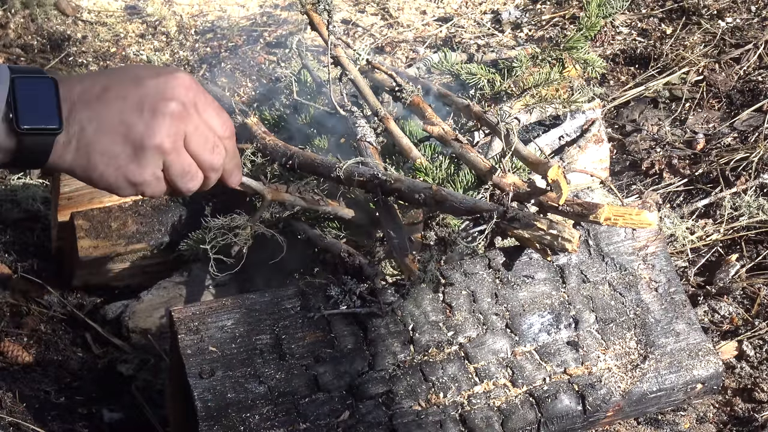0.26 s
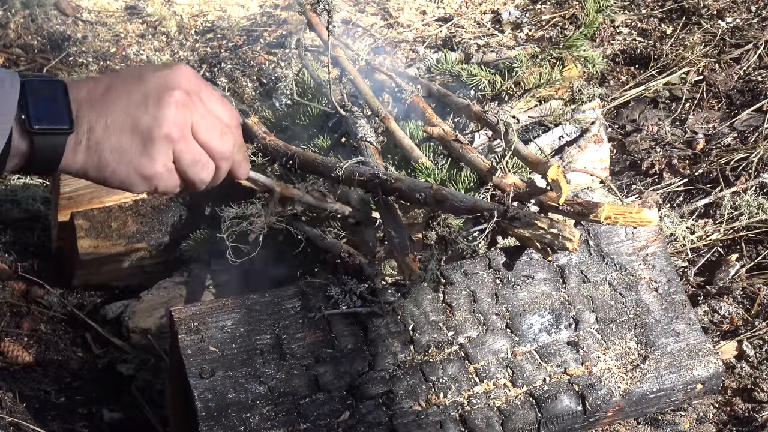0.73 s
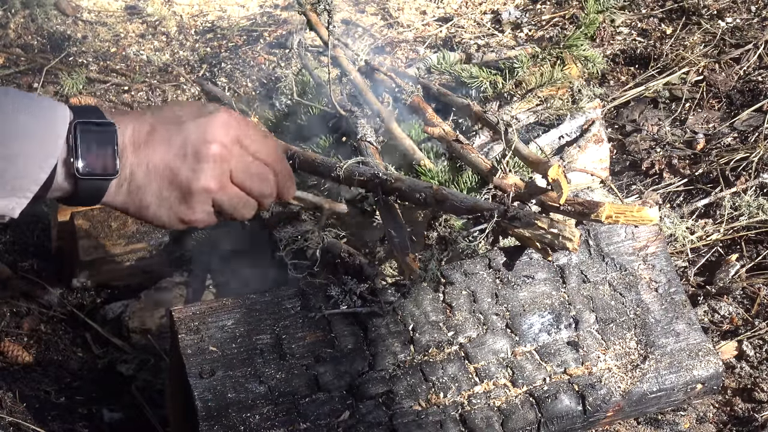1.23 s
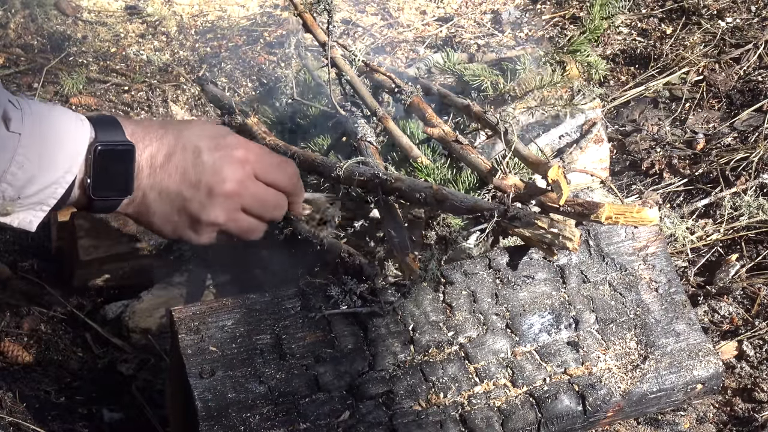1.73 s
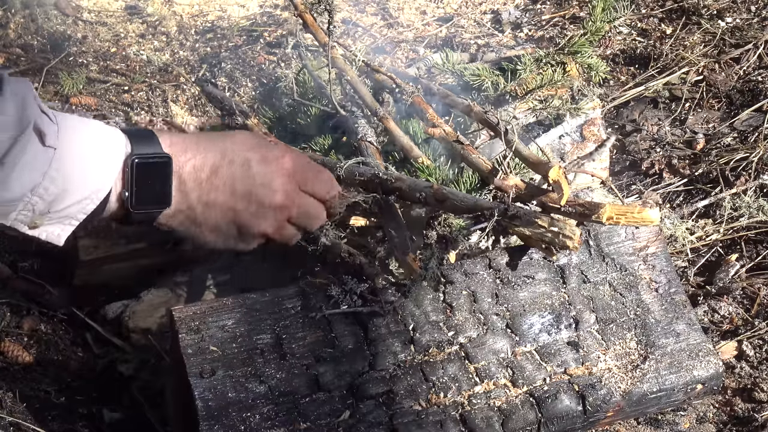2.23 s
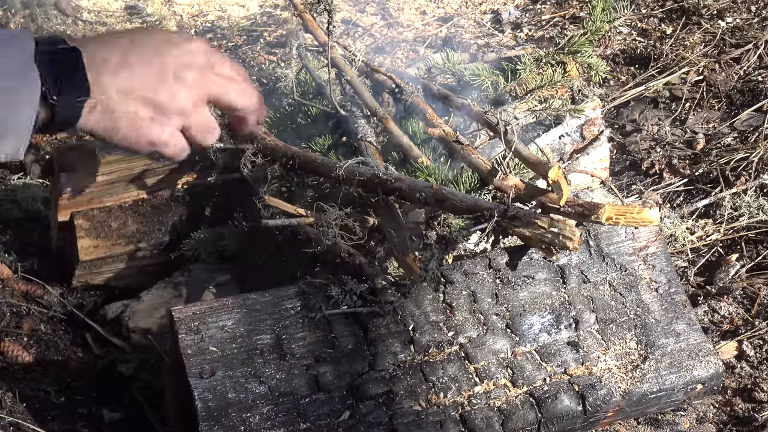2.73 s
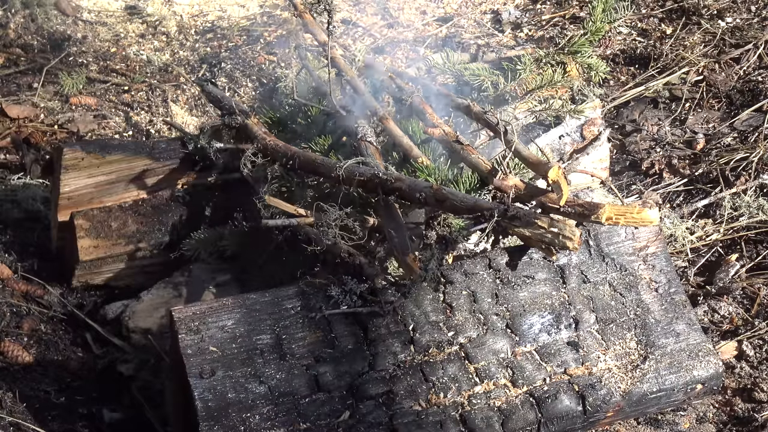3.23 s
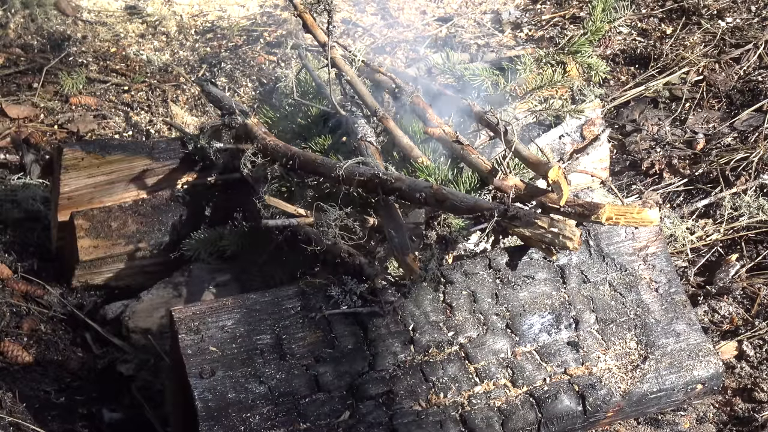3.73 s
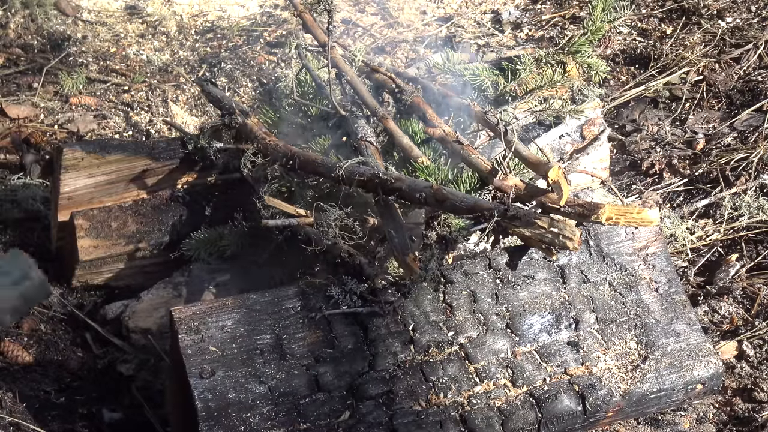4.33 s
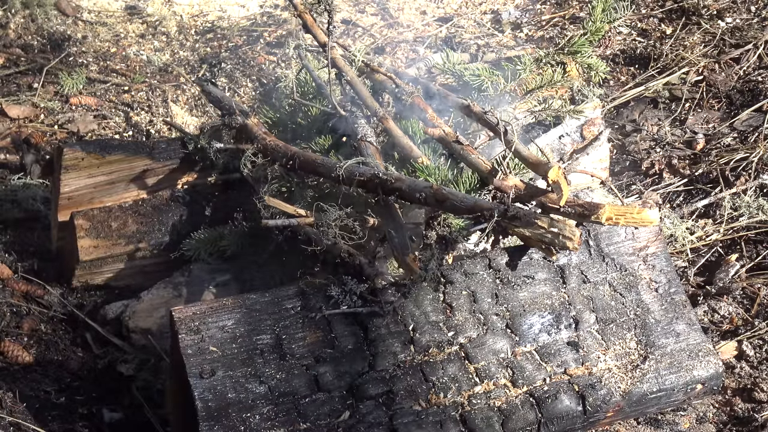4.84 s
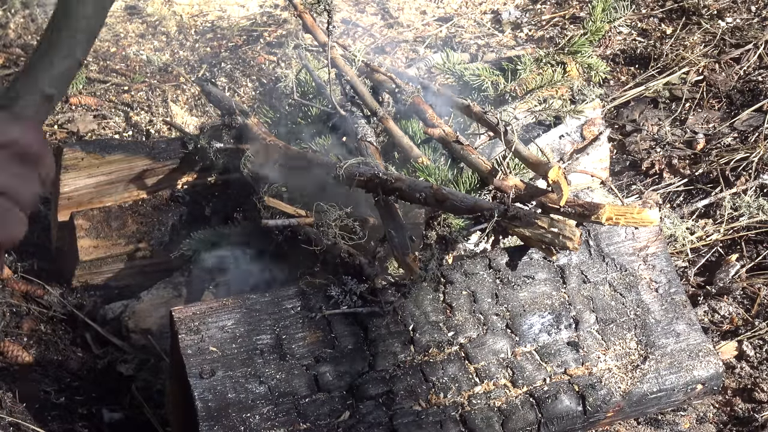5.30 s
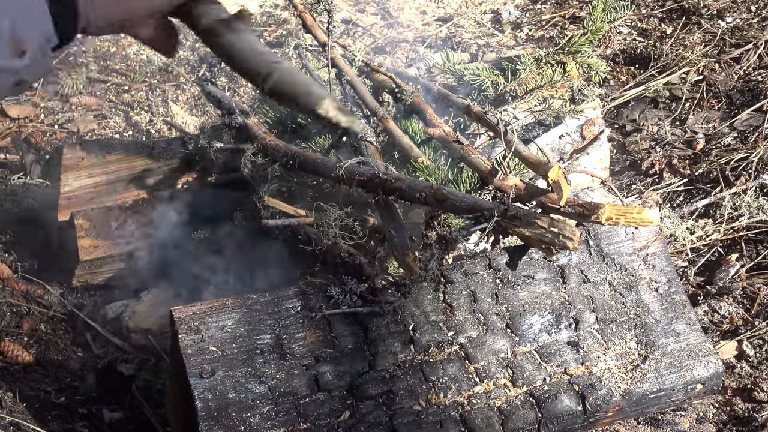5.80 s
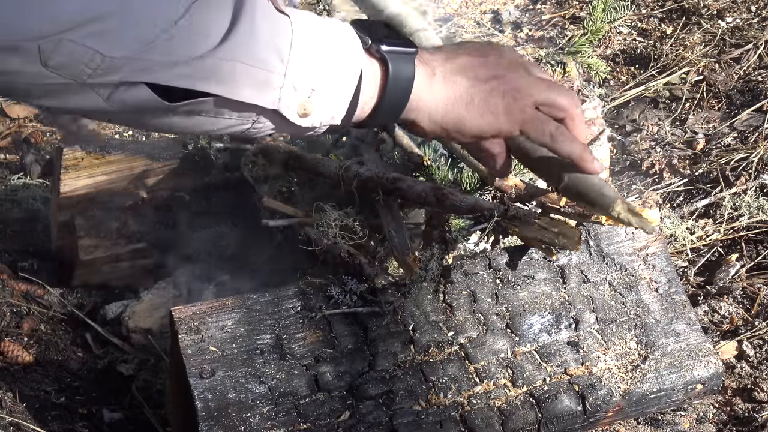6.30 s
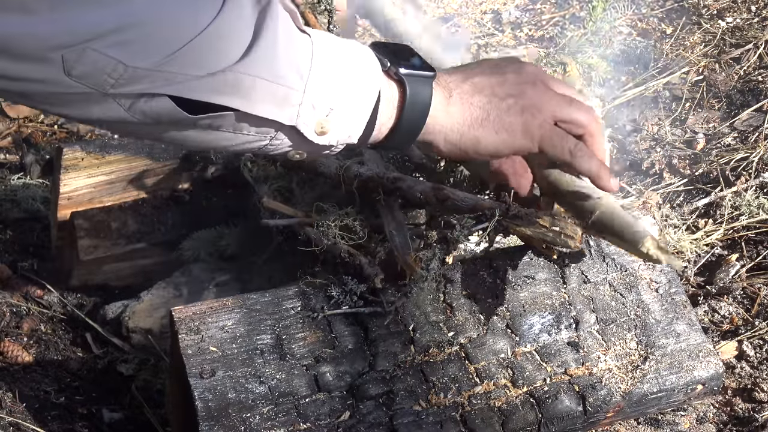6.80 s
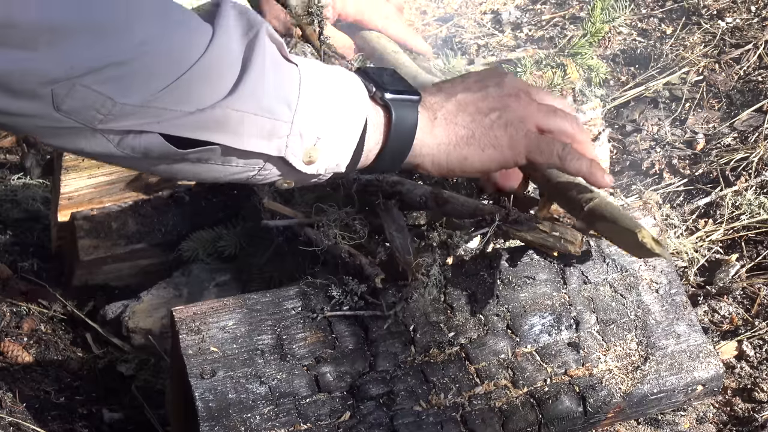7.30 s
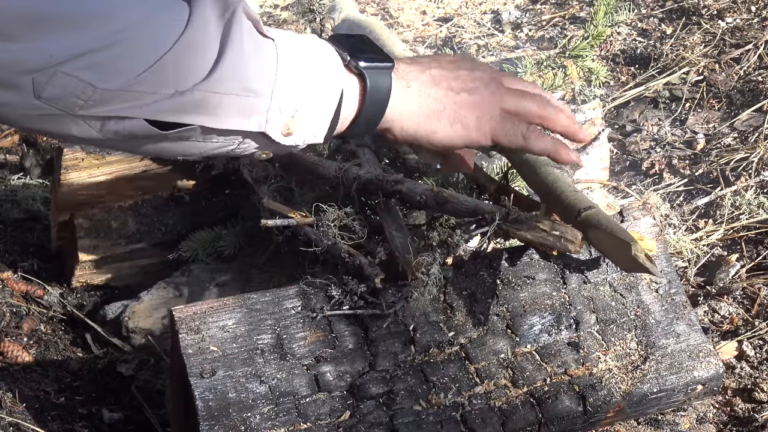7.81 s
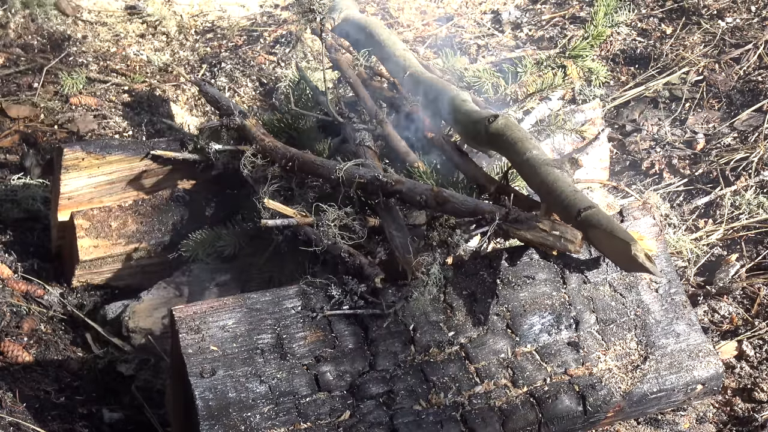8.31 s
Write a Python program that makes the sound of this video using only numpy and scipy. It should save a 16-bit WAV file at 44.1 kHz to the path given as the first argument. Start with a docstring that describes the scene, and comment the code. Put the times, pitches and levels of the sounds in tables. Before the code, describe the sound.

Close, dry twig fire: irregular pops and bright cracks over faint sizzling, sleeve brushing, sticks knocking, and gusts buffeting the microphone towards the end.

```python
"""Sharp cracks of burning twigs come first: a small kindling fire at a forest campsite, heard close by.
Cracks are pulses with a dying spray, split into bands; knocking sticks are struck damped modes.
Rustle, sizzle and a brushing sleeve are coloured noise of fluctuating level; ticks and pips are clicks.
Short narrow-band puffs are noise through a resonance, a far bird chips in falling sines, and gusts
rumble as low noise on a little microphone."""
import sys
import numpy as np
from scipy import signal
from scipy.fft import rfft, irfft, next_fast_len
from scipy.io import wavfile

SR = 44100
rng = np.random.default_rng(int(sys.argv[2]) if len(sys.argv) > 2 else 0)


def wav_record(signal):
    """Record a signal, one row per channel, as 16-bit PCM in the file named by sys.argv[1]."""
    frames = np.transpose(np.atleast_2d(signal))
    bounded = np.clip(frames, -1, 1)
    # unit amplitude maps onto the largest positive 16-bit level
    quanta = np.round(bounded * 32767).astype(np.int16)
    wavfile.write(sys.argv[1], SR, quanta)


N = 377040


def amp(db):
    """Level definition: a level in dB becomes an amplitude gain."""
    return 10 ** (np.asarray(db) / 20)


def rms_one(x):
    """Normalisation: scales a signal to an rms of 1."""
    return x / np.sqrt(np.mean(x ** 2) + 1e-20)


def in_time(rows):
    """Linear interpolation: the columns of a time table at every sample."""
    s, *columns = np.transpose(rows)
    return [np.interp(np.arange(N) / SR, s, c) for c in columns]


def drift(rate_hz):
    """Low-passed noise: a slow random fluctuation of rms 1, from two equal one-pole filters."""
    step = 40   # samples between the coarse points
    r = np.exp(-2 * np.pi * rate_hz * step / SR)
    coarse = rng.standard_normal(N // step + 2002)
    slow = signal.lfilter([1], [1, -2 * r, r * r], coarse)[2000:]   # drops the filter's start
    return np.interp(np.arange(N) / step, np.arange(len(slow)), rms_one(slow))


def coloured(spectrum):
    """Spectral shaping: noise of rms 1 with the given spectrum, falling steeply outside it."""
    hz, db = np.transpose(spectrum)
    size = next_fast_len(N)
    grid = np.log(np.arange(size // 2 + 1) * SR / size + 1e-3)
    ends = np.log(np.r_[hz[0] / 4, hz, hz[-1] * 4])
    shape = amp(np.interp(grid, ends, np.r_[db[0] - 50, db, db[-1] - 50]))
    return rms_one(irfft(rfft(rng.standard_normal(size)) * shape, size)[:N])


def ring(clicks, hz, t60):
    """Damped resonator: a unit click sets a decaying sine of initial height 1 ringing."""
    r, w = amp(-60 / (t60 * SR)), 2 * np.pi * hz / SR
    return signal.lfilter([0, np.sin(w)], [1, -2 * r * np.cos(w), r * r], clicks + 1e-18)


def grit(per_s, spread_db):
    """Clustered point process: sparse clicks of uneven size and random sign; rms 1."""
    born = rng.random(N) < per_s * amp(5 * drift(10)) / SR
    sizes = amp(spread_db * np.minimum(rng.exponential(1, N), 3))
    return rms_one(born * sizes * rng.choice([-1, 1], N))


# bands of a crack, in order snap, body, bright tick, thump: low f/Hz, high f/Hz, level/dB, spray t60/s
BREAK_BANDS = [(2590, 3600, -5, 0.019), (720, 1570, -5.5, 0.019), (6600, 21900, -14, 0.02),
               (199, 890, -12, 0.016)]


def crack_sound(at, levels_db, scatter_db):
    """Impulsive fracture: one sharp pulse and a dying spray of echoes among the sticks, band by band."""
    out, t = np.zeros(N), np.arange(1024) / SR
    spray = rng.standard_normal((len(at), len(t)))
    where = at[:, None] + np.arange(len(t))
    for (low, high, db, t60), level_db in zip(BREAK_BANDS, levels_db):
        shape = amp(scatter_db - 60 * t / t60) * spray
        shape[:, 0] = -1   # the pulse
        # the difference of two low-passes keeps each band's pulse clean
        below = []
        for hz in (low, high):
            low_pass = signal.bessel(2, min(hz, .45 * SR), fs=SR, norm="mag")
            below.append(signal.lfilter(*low_pass, shape))
        edges = [low / 1.114, min(high * 1.295, .45 * SR)]
        shape = signal.lfilter(*signal.butter(1, edges, "band", fs=SR), below[1] - below[0])
        # equal energy: that of rms 1 lasting 4 ms
        shape /= np.sqrt(np.sum(shape ** 2, axis=1, keepdims=True) / (.004 * SR))
        np.add.at(out, where, amp(level_db + db)[:, None] * shape)
    return out


# cracks of burning twigs: t/s, 1 ms before the crack, bright level/dB,
# woody body level/dB re bright, snap level/dB re bright
TWIG_CRACKS = [(0.0084, -29.5, -4.5, -6.5), (0.07, -35.5, -22, -13), (0.309, -46, -20, -5),
               (0.403, -33.5, -26, -14), (0.422, -30, -34, -15), (0.482, -41, -26, -4),
               (0.552, -34, -11.5, -13), (0.5794, -35.5, -17, -8.5), (0.63, -35, -8, -11),
               (0.6642, -31, -16, -16), (0.711, -41, -13, -10), (0.7993, -33.5, -6.5, -10),
               (0.83, -33.5, -39, -8.5), (0.857, -29.5, -26, -35), (1.0395, -38, -30, -23),
               (1.077, -26, -31, -14), (1.0929, -11, -21, -14.5), (1.1128, -35, -14, -11),
               (1.166, -32.5, -8.5, -7.5), (1.181, -30.5, -32, -20), (1.1982, -40, -17, -9),
               (1.2225, -42, -14, -4), (1.2404, -38.5, -7.5, -9), (1.2667, -41, -20, -11),
               (1.3519, -34.5, -20, -13), (1.458, -33.5, -6, -7.5), (1.5, -39.5, -18, -4),
               (1.5783, -41, -25, 0), (1.6242, -38, -16, -5.5), (1.7806, -30.5, -4, -7),
               (1.8085, -31.5, -13, -10), (1.84, -32, -36, -31), (1.862, -31, -39, -18.5),
               (2.0362, -23.5, -32, -14), (2.1093, -31, -19, -13.5), (2.1466, -29.5, -11.5, -11),
               (2.2952, -33, -16, -17), (2.355, -35, -14.5, -11), (2.5926, -6.5, -17.5, -13.5),
               (2.742, -37, 0.5, -8), (2.778, -41, -8, -6), (2.9733, -33, -22, -21),
               (3.0769, -29.5, -11.5, -10.5), (3.7378, -38, -14, -7), (3.7504, -34, -10.5, -3.5),
               (3.7683, -33, -20, -2.5), (3.8904, -33.5, -12.5, -10.5), (3.941, -26.5, -20.5, -44),
               (4.0346, -36, -27, -11), (4.309, -31, -13, -8.5), (4.4677, -33, -13, -6.5),
               (4.7727, -41.5, -4.5, -6), (4.808, -29.5, -17, -10), (5.0178, -29, -14.5, -9.5),
               (5.038, -53, -18, -8), (5.0709, -45, -7, -12), (5.078, -42, -13, -11),
               (5.122, -37.5, -24, -11), (5.251, -37, -14, -11.5), (5.2703, -46, -20, -13),
               (5.3397, -21, -15.5, -10.5), (5.394, -38, -16, -16), (5.477, -31, -23, -11),
               (5.4873, -40, -11, -9), (5.5274, -44.5, -12, -6), (5.5634, -42, -18, -10),
               (5.577, -37, -10, -8), (5.585, -26, -17, -12.5), (5.6165, -26.5, -16.5, -14.5),
               (5.6317, -44, -5, 0.5), (5.6499, -30.5, -9.5, -5), (5.7013, -39.5, -12, -9),
               (5.7408, -37.5, -24, -12), (5.7941, -46, -22, -5), (5.819, -40, -22, -11),
               (5.8586, -34.5, -35, -9), (5.894, -35, -20, -12), (5.9479, -36, 3, -25),
               (6.008, -42, -16, -6), (6.051, -41.5, -3.5, -8), (6.116, -43, -18, -6.5),
               (6.1391, -41.5, -5, -6), (6.186, -39, -20, -9), (6.2334, -49, -15, -2),
               (6.2713, -34.5, -26, -8), (6.28, -39, -20, -4), (6.378, -34.5, -8.5, -7),
               (6.4917, -38, -13, -12), (6.5453, -34, -8, -11), (6.622, -33.5, -15, -18),
               (6.726, -42.5, -8, -4.5), (6.752, -30.5, -11, -10), (6.7724, -31, -11.5, -6.5),
               (6.8316, -38, -29, -11.5), (6.899, -43, -14, -7), (6.912, -34.5, -15, -11),
               (6.931, -35, -20, -12), (6.961, -33.5, -3, -11), (6.993, -29, -8.5, -9.5),
               (7.1227, -15, -14, -14.5), (7.1512, -42, -4.5, -3), (7.235, -36.5, -6, -8),
               (7.2693, -27.5, -41, -7), (7.3263, -29, -33, -15), (7.337, -36, -27, -4),
               (7.342, -17, -15, -12), (7.3711, -36.5, -32, -8.5), (7.4319, -27.5, -20, -40),
               (7.448, -32, -15, -12), (7.475, -43, -4, -5), (7.5055, -29, -29, -17.5),
               (7.531, -43, -6, -20), (7.5366, -29.5, -14, -8.5), (7.5406, -27.5, -16.5, -7),
               (7.5997, -37, -2.5, -6), (7.7044, -28.5, -16.5, -12.5), (7.719, -34.5, -10.5, -12),
               (7.7246, -38, -20, -5), (7.749, -44, -3, -5), (7.792, -46.5, 3, -1), (7.8133, -45.5, 5, -18),
               (7.857, -32, -38, -11), (7.9034, -38.5, -1.5, -4), (7.9204, -38, -22, -8),
               (8.1292, -36.5, -1.5, -7), (8.1479, -38, -6, -7), (8.199, -26, -49, -10)]


def cracks():
    """Brittle fracture: the loud breaks that stand out; each sounds 1 ms after its table time."""
    s, bright_db, body_db, snap_db = np.transpose(TWIG_CRACKS)
    at = ((s + .001) * SR).astype(int)
    scatter_db = (-23.5 + 0.1 * bright_db)[:, None]   # weaker cracks spray less after the pulse
    body_level_db = bright_db + body_db   # also drives the thump
    return crack_sound(at, (bright_db + snap_db, body_level_db, bright_db, body_level_db), scatter_db)


def small_cracks(per_s, level_db, spread_db, colour_db):
    """Clustered random process: faint cracks in clumps, each with its own size and colour."""
    count = 1500   # candidates, so also the most that can sound
    draws = rng.random((count, 2))
    colour = rng.standard_normal((count, 3))
    size = np.minimum(rng.exponential(1, count), 3)
    at = (draws[:, 0] * (N - 1024)).astype(int)
    chance = per_s * amp(4 * drift(8)) * N / SR / count
    heard = draws[:, 1] < chance[at]
    # snap, body and bright tick only, without a thump
    levels_db = level_db + spread_db * size[:, None] + colour_db * colour + [0.0, -6.0, 9.0]
    return crack_sound(at, (levels_db - 200 * ~heard[:, None]).T, scatter_db=-20)


# low modes of the pile: f/Hz, level/dB, t60/s
PILE_MODES = [(233, 1, 0.041), (381, -2, 0.044), (440, 6, 0.02), (620, -3.5, 0.0038)]
# modes of a stick: f/Hz, level/dB, t60/s when it rings freely
STICK_MODES = [(1020, 2, 0.078), (1320, 2, 0.066), (1550, 1, 0.04), (1890, 9, 0.07)]
# sticks knocking on the pile: t/s, thud level/dB, ring level/dB
STICK_KNOCKS = [(2.146, -44.5, -63), (2.744, -42.5, -68), (3.25, -55, -59), (4.254, -44, -72),
                (4.642, -47, -77), (4.67, -50, -82), (4.755, -48.5, -69), (4.89, -51, -60),
                (5.947, -49.5, -58), (6.754, -46, -71), (6.897, -61, -46), (6.956, -52, -52.5),
                (7.237, -40, -50), (7.261, -39, -66), (7.345, -48, -78), (7.484, -48, -80),
                (7.6, -44.5, -58), (7.749, -45.5, -54.5), (7.811, -33, -52), (7.906, -37, -50)]


def knocks():
    """Modal excitation: a rough contact drives the pile's thud and a stick, free only if it glances off."""
    out, t = np.zeros(N + 4096), np.arange(4096) / SR
    s, thud_db, ring_db = np.transpose(STICK_KNOCKS)
    where = (s * SR).astype(int)[:, None] + np.arange(len(t))
    # a pressed stick (thud over ring) rings shorter: 1.4 dB of t60 per dB
    free = amp(1.4 * np.minimum(ring_db - thud_db, 0))[:, None]
    pile = (PILE_MODES, thud_db, 0.0076, 1)   # modes, level/dB, contact decay/s, share of t60
    stick = (STICK_MODES, ring_db, 0.0032, free)
    for modes, level_db, contact_s, lasting in (pile, stick):
        for hz, db, t60 in modes:
            contact = rng.standard_normal((len(s), 1024)) * np.exp(-t[:1024] / contact_s)
            contact /= np.sqrt(np.sum(contact ** 2, axis=1, keepdims=True))
            # pressing also makes the stick's modes stray in pitch
            pitch = hz * (1 + 0.085 * (1 - lasting) * rng.standard_normal((len(s), 1)))
            decay = amp(-60 * t / np.maximum(t60 * lasting, .003))
            mode = decay * np.sin(2 * np.pi * pitch * t)
            struck = signal.fftconvolve(contact, mode, axes=1)[:, :len(t)]
            np.add.at(out, where, amp(level_db + db)[:, None] * struck)
    return out[:N]


def rubbing(below_db, t60):
    """Stick-slip friction: after each knock, dying slips of bark on bark sound the pile's low modes."""
    s, thud_db, _ = np.transpose(STICK_KNOCKS)
    drag = np.zeros(N)
    drag[(s * SR).astype(int)] = amp(thud_db + below_db)
    dying = signal.lfilter([1], [1, -amp(-60 / (t60 * SR))], drag + 1e-18)
    slips = dying * grit(per_s=500, spread_db=3.0)
    return sum(amp(db) * ring(slips, hz, decay) for hz, db, decay in PILE_MODES)


def forest(x):
    """Diffuse reverberation: trees and ground scatter back a faint, exponentially decaying tail."""
    t = np.arange(SR // 2) / SR
    tail = amp(-60 * t / 0.27) * rng.standard_normal(len(t))   # t60 0.27 s
    tail /= np.sqrt(np.sum(tail ** 2))
    return x + amp(-22.5) * signal.fftconvolve(x, tail)[:N]


# rustle spectrum: f/Hz, relative level/dB per Hz
RUSTLE_SPECTRUM = [(300, -25), (600, 6.5), (1200, 0), (2000, -0.5), (3500, -9), (6000, -6.5)]
# sizzle and hiss spectrum: f/Hz, relative level/dB per Hz
SIZZLE_SPECTRUM = [(1500, -19), (2500, -4.5), (4000, -4.5), (6500, -8), (10000, 1.5), (16000, -0.5)]
# liveliness of the pile: t/s, rustle level/dB
PILE_LIVELINESS = [(0, -64.5), (.9, -68.5), (1.5, -62), (2.4, -71), (3.27, -65), (3.45, -63.5), (3.9, -68),
                   (4.75, -59.5), (4.95, -64), (5.3, -70), (5.8, -66.5), (7.6, -65), (8.55, -66.5)]


def rustle_and_sizzle():
    """Modulated broadband noise: the pile's rustle and the sap's sizzle flicker partly together."""
    rustle_db, = in_time(PILE_LIVELINESS)
    shared = drift(13.7)
    rustle_gain = amp(rustle_db + 2.8 * shared + 0.29 * drift(70))
    sizzle_gain = amp(rustle_db - 3 + 3.3 * shared + 2.0 * drift(210))
    return rustle_gain * coloured(RUSTLE_SPECTRUM) + sizzle_gain * coloured(SIZZLE_SPECTRUM)


def ticks(below_db):
    """High-passed impulses: bursting cells tick as sharp clicks whose level follows the pile's rustle."""
    rustle_db, = in_time(PILE_LIVELINESS)
    high_pass = signal.butter(2, 1600, "high", fs=SR)
    return amp(rustle_db + below_db) * signal.lfilter(*high_pass, grit(per_s=70, spread_db=10.0))


def needle_pips(per_s, level_db, cycles):
    """Shock-excited resonance: bursting needles click and ring a few cycles at one of ten pitches."""
    sizes = amp(level_db + 4.57 * np.minimum(rng.exponential(1, N), 3.5)) * rng.choice([-1, 1], N)
    born = rng.random(N) < per_s * amp(4 * drift(6)) / SR
    dealt = rng.integers(0, 10, N)
    pitches = np.r_[np.geomspace(2500, 4300, 6), np.geomspace(1200, 9000, 4)]
    # each pip falls by 60 dB in the given number of cycles
    return sum(ring(sizes * born * (dealt == k), hz, cycles / hz) for k, hz in enumerate(pitches))


# brushes of sleeve and twigs against the pile: t/s, length/s before the added edge and fade,
# rustle level/dB, hiss level/dB
BRUSH_STROKES = [(0.375, 0.038, -70, -60), (0.533, 0.34, -69, -63), (1.243, 0.094, -64.5, -69),
                 (1.55, 0.056, -62.5, -80), (2.135, 0.16, -65, -89), (2.805, 0.43, -58, -61),
                 (3.682, 0.056, -68, -54), (4.193, 0.15, -57.5, -63), (4.366, 0.19, -61.5, -66),
                 (4.565, 0.3, -66.5, -61), (5.1, 0.07, -73, -60.5), (5.886, 0.0094, -56, -56),
                 (6.01, 0.32, -65.5, -64.5), (6.625, 0.019, -53, -59), (6.886, 0.045, -61, -68),
                 (7.727, 0.14, -64.5, -87)]


def swishes(edge_s, held, fade_s):
    """Amplitude envelope: each brush starts quickly, holds for a share of its length and fades."""
    t, out = np.arange(N) / SR, np.zeros((2, N))
    for s, length, rustle_db, hiss_db in BRUSH_STROKES:
        full = s + edge_s
        corners = [s, full, full + held * length, full + length + fade_s]
        out += amp([[rustle_db], [hiss_db]]) * np.interp(t, corners, [0, 1, 1, 0])
    return out


# cloth rustle spectrum: f/Hz, relative level/dB per Hz
CLOTH_SPECTRUM = [(500, 5), (1000, 10), (1450, 8.5), (2300, 9.5), (4500, 3.5), (6500, 2.5)]


def brushes():
    """Friction noise: sleeve and twigs brush the pile with a cloth rustle and a hiss of uneven level."""
    rustle_gain, hiss_gain = swishes(edge_s=0.023, held=0.74, fade_s=0.024)
    rustle = rustle_gain * amp(0.65 * drift(6.0)) * coloured(CLOTH_SPECTRUM)
    hiss = hiss_gain * coloured(SIZZLE_SPECTRUM)
    return amp(1.7 * drift(81)) * (rustle + hiss)


# short narrow-band puffs near 3 kHz, squeaks or close runs of clicks: t/s, f/Hz, level/dB
NARROW_PUFFS = [(1.606, 3200, -53), (1.641, 3350, -53), (3.948, 3400, -55), (4.24, 2600, -51)]


def narrow_puffs(width_hz):
    """Band-pass resonance: each event is a 17 ms puff of noise through one narrow resonance."""
    out, size = np.zeros(N), int(0.017 * SR)
    for s, hz, db in NARROW_PUFFS:
        edges = [hz - width_hz / 2, hz + width_hz / 2]
        band = signal.butter(2, edges, "band", fs=SR, output="sos")
        puff = rms_one(signal.sosfilt(band, rng.standard_normal(4096)))[-size:]
        out[int(s * SR):int(s * SR) + size] += amp(db) * np.hanning(size) * puff
    return out


# chips of a far bird: t/s
BIRD_CHIPS = [2.26, 3.595, 4.143, 5.21]


def bird():
    """Frequency glide: short falling whistles, all alike, are sines of accumulated phase."""
    out, size = np.zeros(N), int(.025 * SR)
    phase = 2 * np.pi * np.cumsum(np.linspace(6050, 5830, size)) / SR   # falling f/Hz
    chip = amp(-66) * np.hanning(size) * np.sin(phase)
    for s in BIRD_CHIPS:
        out[int(s * SR):int(s * SR) + size] += chip
    return out


# slow heaves of the wind: f/Hz, relative level/dB per Hz
RUMBLE_SPECTRUM = [(6, 7), (12, -1), (24, 1.5), (35, -5.5), (60, -34)]
# buffets: f/Hz, relative level/dB per Hz
BUFFET_SPECTRUM = [(35, -1.5), (55, 4.5), (90, -4), (140, -11.5), (220, -20)]
# fast flutter: f/Hz, relative level/dB per Hz
FLUTTER_SPECTRUM = [(100, 5), (170, 1), (300, -2), (500, -2.5), (900, -32)]
# gusts on the microphone: t/s, rumble level/dB, buffet level/dB, flutter level/dB
WIND_GUSTS = [(0.0, -52, -58.5, -59), (0.26, -43, -57.5, -67), (0.48, -52.5, -61.5, -65.5),
              (1.05, -47, -60.5, -58), (1.47, -44, -54.5, -63), (2.36, -43.5, -52.5, -60),
              (3.74, -44.5, -55.5, -67), (3.88, -51.5, -60, -65), (4.62, -40.5, -52.5, -63),
              (5.1, -44, -55, -63.5), (5.56, -41.5, -53, -64), (5.7, -33.5, -45, -61),
              (6.0, -35, -42.5, -65.5), (6.12, -42.5, -46.5, -57), (6.3, -38.5, -48, -61),
              (6.53, -43, -54.5, -59), (7.19, -36.5, -51, -55.5), (7.5, -44, -51.5, -57.5),
              (7.68, -32.5, -52, -56), (8.05, -28, -41.5, -55.5), (8.55, -31.5, -47.5, -59)]


def wind():
    """Turbulent pressure noise: lumpy low noise on the microphone port, from slow heaves to flutter."""
    gust_db, buffet_db, flutter_db = in_time(WIND_GUSTS)
    rumble = amp(gust_db + 2.26 * drift(15.7)) * coloured(RUMBLE_SPECTRUM)
    buffet = amp(buffet_db + 2.0 * drift(8.1)) * coloured(BUFFET_SPECTRUM)
    flutter = amp(flutter_db + 3.08 * drift(15.0)) * coloured(FLUTTER_SPECTRUM)
    return rumble + buffet + flutter


def scene():
    """Superposition: fire, hands and bird add up at the microphone, and the wind buffets it."""
    fire = forest(cracks() + knocks())
    fire += small_cracks(per_s=170, level_db=-70.5, spread_db=3.0, colour_db=6.5)
    fire += rubbing(below_db=-41.5, t60=0.53)
    fire += rustle_and_sizzle() + ticks(below_db=-5)
    fire += needle_pips(per_s=70, level_db=-58, cycles=4.5)
    return (fire + brushes() + narrow_puffs(width_hz=580) + bird() + wind())[None]


# resonances and dips of the microphone housing: f/Hz, width/Hz, level/dB
HOUSING_RESONANCES = [(1303, 590, 3.5), (2260, 600, -2.5), (3295, 1150, 2), (8150, 2170, 6),
                      (10610, 3300, -7), (13500, 9200, -2.5), (15040, 3900, -11.5)]


def record(dry):
    """Linear filtering: the housing's resonances and dips colour the sound, then the top is cut."""
    out = dry
    for hz, width_hz, db in HOUSING_RESONANCES:
        w, gain = 2 * np.pi * hz / SR, amp(db / 2)
        alpha = np.sin(w) * width_hz / hz / 2
        zeros = [1 + alpha * gain, -2 * np.cos(w), 1 - alpha * gain]
        poles = [1 + alpha / gain, -2 * np.cos(w), 1 - alpha / gain]
        out = signal.lfilter(zeros, poles, out)
    # at least 70 dB down from 16200 Hz upward
    return signal.sosfilt(signal.cheby2(22, 70, 16200, fs=SR, output="sos"), out)


dry = scene()
out = record(dry)
wav_record(out)
```